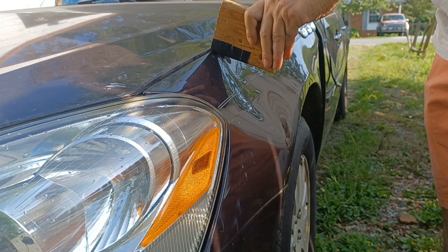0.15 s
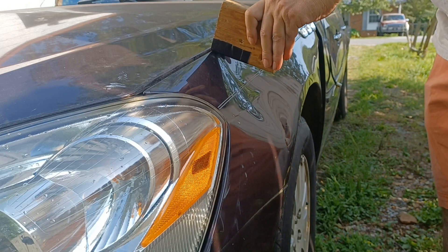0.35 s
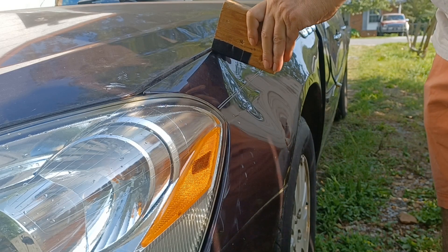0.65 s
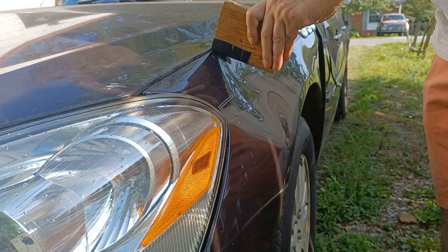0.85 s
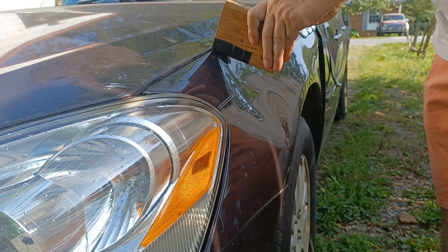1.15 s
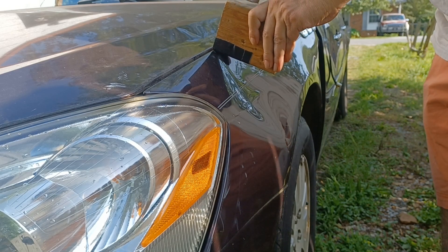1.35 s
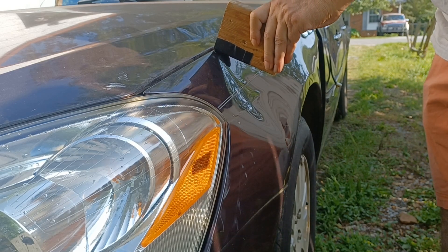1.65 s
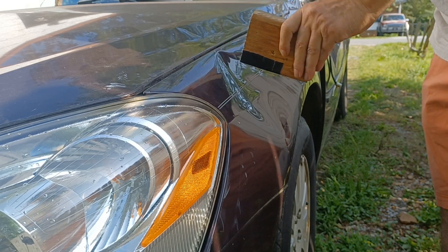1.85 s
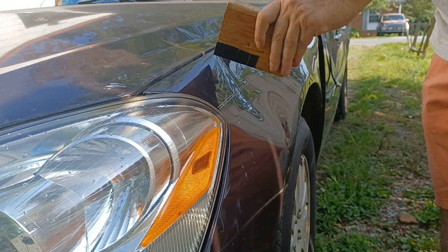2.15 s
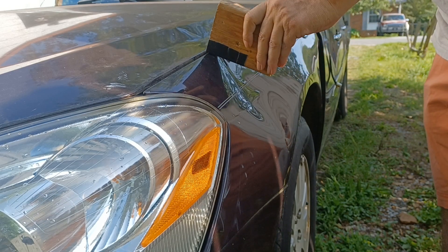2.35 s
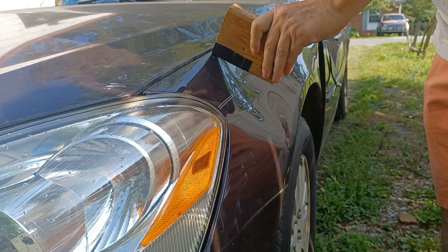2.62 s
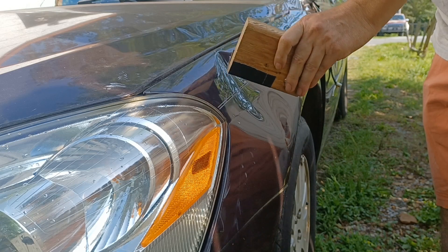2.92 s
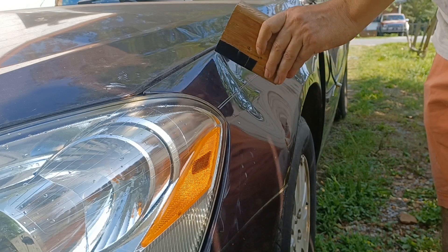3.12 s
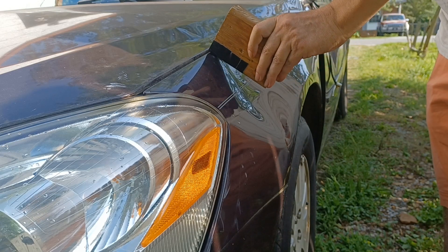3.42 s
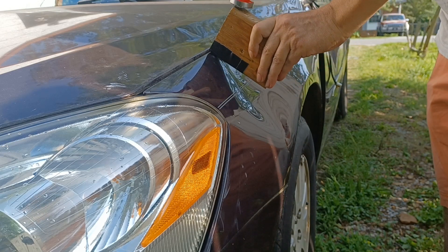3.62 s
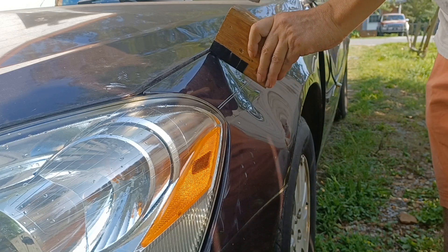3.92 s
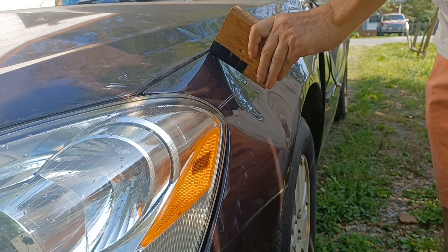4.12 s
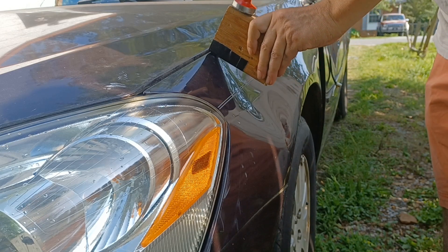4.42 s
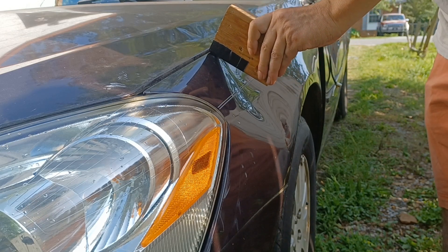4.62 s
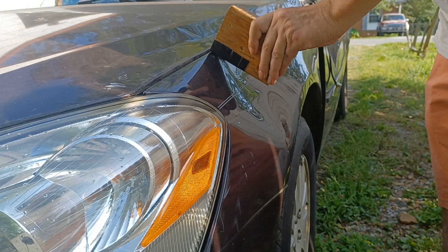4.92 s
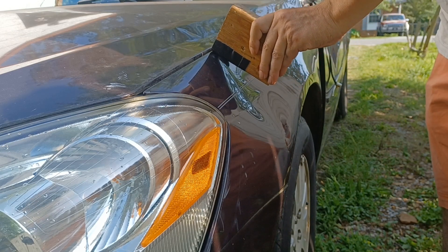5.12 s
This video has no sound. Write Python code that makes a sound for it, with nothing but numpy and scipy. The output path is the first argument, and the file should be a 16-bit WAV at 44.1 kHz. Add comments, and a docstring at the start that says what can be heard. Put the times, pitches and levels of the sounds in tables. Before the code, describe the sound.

Outdoors, over faint cicadas and a low hum of far machinery, a hammer drives a wood block against a steel car fender close to the microphone. A fast run of seven hard knocks makes the panel clang briefly each time. After a pause with a couple of soft taps, six more knocks build from dull to sharp, the last few sounding thinner on the left side.

```python
"""A hammer drives a hand-held wooden block against a car's steel fender: two runs, light taps between.
Each blow ticks on the wood, knocks the block, rings the panel's bending modes and buzzes its edges.
The yard echoes faintly; steady cicadas and far machinery rise and fall with the recorder's gain.
The right microphone is duller; late on, the left side loses bass and dips briefly at each knock."""
import sys
import numpy as np
from scipy import signal
from scipy.fft import rfft, irfft, next_fast_len
from scipy.io import wavfile
from scipy.ndimage import uniform_filter1d

SR = 44100
rng = np.random.default_rng(int(sys.argv[2]) if len(sys.argv) > 2 else 0)


def to_wav(s):
    """Save 16-bit WAV."""
    ch = np.atleast_2d(s).T  # columns
    pcm = np.round(np.clip(ch, -1, 1) * 32767)  # PCM
    wavfile.write(sys.argv[1], SR, pcm.astype(np.int16))


N = 232126
RING_SIZE = 2 ** 15
TIME_S, AGE_S = np.arange(N) / SR, np.arange(RING_SIZE) / SR

# hammer blows: (time [s], force [dB], contact corner [Hz], bass gain [dB])
BLOWS = [ (0.0504, 0, 3670, -2), (0.3618, -1, 3030, -0.5), (0.6372, 0, 3600, -1), (0.9247, 0, 3600, -2.5),
         (1.1932, 0, 3260, -2), (1.4720, 0, 3400, -3), (1.7301, 0, 3240, -2.5), (2.5228, -24.5, 880, -8),
         (3.4090, -16, 646, -4), (3.7153, -6, 600, 4), (4.0253, -1.5, 1310, 4.5), (4.3029, -1, 1460, 4),
         (4.5740, 0, 2200, 1.5), (4.8391, 0.5, 2180, 2.5), (5.1005, 0.5, 2500, 2)]
# panel response with the block moved to its second seat: (frequency [Hz], gain [dB])
SECOND_SEAT_EQ = [(250, -1.5), (360, 1.5), (520, -1), (660, -2.5), (1000, 3.5), (1400, 3.5), (2000, 0)]


def hammer(moved_s=3.0, moved_wood_db=1, fresh_share=0.4, bass_hz=170, mid_hz=420):
    """Each blow rings block and panel; a softer, longer contact takes the treble away."""
    track = np.zeros((2, N))
    modes, base_clang, wood = fender(), clang(), block()
    tick, edge_eq = face_tick(), edge_resonances()
    for time_s, force_db, corner_hz, bass_db in BLOWS:
        wood_db, buzz_db, tick_db = contact_levels(force_db, corner_hz)
        # the block shifts between blows and wakes slightly different weak modes
        ring = disperse(modes + np.sqrt(1 - fresh_share) * base_clang + np.sqrt(fresh_share) * clang())
        if time_s > moved_s:
            ring = colour(ring, SECOND_SEAT_EQ)
            wood_db += moved_wood_db
        contact = signal.butter(2, corner_hz, fs=SR, output="sos")
        knock = signal.sosfilt(contact, ring + undb(wood_db) * wood)
        # a firmly pressed block moves the whole panel, a loose one only its higher modes
        knock = colour(knock, [(bass_hz, bass_db), (mid_hz, 0)])
        buzz = edge_buzz(ring, edge_eq)
        add(track, undb(force_db) * knock + undb(buzz_db) * buzz + undb(tick_db) * tick, time_s)
    return track


def contact_levels(force_db, corner_hz, firm_hz=1360):
    """Contact softer than firm_hz weakens wood and buzz; the tick grows with hardness."""
    hardness_oct = np.log2(corner_hz / firm_hz)
    softness_oct = max(-hardness_oct, 0)
    wood_db = 1.5 - 14.5 * softness_oct
    buzz_db = force_db - 13 * softness_oct
    tick_db = force_db - 11 + 12.5 * hardness_oct
    return wood_db, buzz_db, tick_db


# steel-on-wood spectrum: (frequency [Hz], level [dB])
TICK_SPECTRUM = [(500, -28.5), (2000, -15.5), (3800, -17), (6300, -9), (8000, -34), (16000, -40)]


def face_tick(t60_s=0.0052):
    """The steel face meets the wood in a short noise burst."""
    return colour(noise(RING_SIZE, likeness=0.35) * fade(AGE_S, t60_s), TICK_SPECTRUM)


# wooden block modes: (frequency [Hz], level [dB], t60 [s])
BLOCK_MODES = [(1096, 4, 0.011), (1330, -4, 0.016), (1754, -1.5, 0.018)]


def block(rise_s=0.0038):
    """Hand-damped wood gives a brief hollow knock."""
    wood = sum((-1) ** k * undb(db) * fade(AGE_S, t60_s) * np.sin(2 * np.pi * hz * AGE_S)
               for k, (hz, db, t60_s) in enumerate(BLOCK_MODES))
    return rise(rise_s) * wood


# fender bending modes: (frequency [Hz], level [dB], t60 before block damping [s])
FENDER_MODES = [(113.8, -35, 0.71), (167.5, -13, 0.22), (142.9, -15.5, 0.33), (191.9, -17, 0.29),
                (231.5, -22.5, 0.37), (217.6, -18.5, 0.36), (246, -14.5, 0.34), (277.1, -20, 0.33),
                (323.3, -23.5, 0.29), (379.3, -8, 0.13), (364, -18.5, 0.28), (430, -26, 0.37),
                (475, -2, 0.023), (498.6, -10.5, 0.17), (553, -22, 0.34), (635, -16.5, 0.15),
                (713, -13.5, 0.085), (837.4, -20, 0.17), (917, -22, 0.082), (956.4, -23.5, 0.13),
                (999, -19, 0.11), (1119, -28.5, 0.22), (1144, -25, 0.029), (1346, -31, 0.18),
                (1490, -15.5, 0.0085), (1595, -24, 0.14), (1642, -19, 0.047), (1884, -17, 0.16),
                (2106, -38, 0.089), (2340, -27.5, 0.065)]


def fender(mean_lag_s=0.00006, lag_spread_s=0.00018, grip_t60_s=0.94, grip_hz=500):
    """The panel's main modes ring; the pressed block damps the higher ones most."""
    ring = np.zeros((2, RING_SIZE))
    # each mode radiates from its own patch, so has its own lag between the microphones
    lags_s = mean_lag_s + lag_spread_s * rng.standard_normal(len(FENDER_MODES))
    for k, ((hz, db, t60_s), lag_s) in enumerate(zip(FENDER_MODES, lags_s)):
        held_t60_s = 1 / (1 / t60_s + min(hz / grip_hz, 1) ** 3 / grip_t60_s)
        age_s = np.maximum(AGE_S - np.array([[lag_s], [-lag_s]]) / 2, 0)
        ring += (-1) ** k * undb(db) * fade(AGE_S, held_t60_s) * np.sin(2 * np.pi * hz * age_s)
    return ring


# spectrum of the weak panel modes: (frequency [Hz], level [dB])
CLANG_SPECTRUM = [(30, -26.5), (65, -20.5), (110, -6.5), (200, -11), (450, -2), (750, -3), (1100, -9.5),
                  (1500, -7), (2200, -5.5), (2700, -18.5), (4000, -31.5), (8000, -19.5)]


def clang(low_t60_s=0.17, high_t60_s=0.11, split_hz=1100, hold_s=0.016, rise_s=0.0019):
    """Dense modes blur into a noisy clang whose upper band dies first."""
    lowpass = signal.butter(4, split_hz, fs=SR, output="sos")
    highpass = signal.butter(4, split_hz, "high", fs=SR, output="sos")
    low = signal.sosfilt(lowpass, noise(RING_SIZE, likeness=0.45)) * fade(AGE_S - hold_s, low_t60_s)
    high = signal.sosfilt(highpass, noise(RING_SIZE, likeness=0.29)) * fade(AGE_S - hold_s, high_t60_s)
    return colour(rise(rise_s) * (low + high), CLANG_SPECTRUM)


def disperse(ring, travel_s=0.000892):
    """Bending waves cross the sheet in travel_s at 1 kHz; lower ones arrive later."""
    hz = np.arange(RING_SIZE // 2 + 1) * SR / RING_SIZE
    return irfft(rfft(ring) * np.exp(-4j * np.pi * travel_s * np.sqrt(1000 * hz)))


# panel edge buzz spectrum: (frequency [Hz], level [dB])
BUZZ_SPECTRUM = [(800, -52.5), (2000, -14), (3000, -16), (4500, -17), (6700, -20), (7900, -36.5),
                 (10000, -30.5), (12500, -29), (16000, -34)]


def edge_buzz(ring, edge_eq, hold_s=0.019, t60_s=0.11, rise_s=0.0016, chatter=0.24):
    """The panel's edges chatter briefly, hardest at the crests of its swing."""
    swing = np.abs(ring[0])
    crests = swing / (uniform_filter1d(swing, size=600) + 1e-9)
    envelope = rise(rise_s) * fade(AGE_S - hold_s, t60_s) * (1 + chatter * (crests - 1))
    hiss = colour(noise(RING_SIZE, likeness=0.2) * envelope, BUZZ_SPECTRUM)
    return colour(hiss, edge_eq)


def edge_resonances(ripple_db=2.0, mean_db=-1):
    """Narrow edge resonances as a random ripple: (frequency [Hz], gain [dB])."""
    hz = np.geomspace(2000, 16000, 220)
    return np.column_stack([hz, mean_db + ripple_db * rng.standard_normal(len(hz))])


def yard(knocks, gain_db=-17, t60_s=0.37, first_s=0.016):
    """Scattered echoes from car body, ground and nearby walls."""
    echoes = noise(RING_SIZE, likeness=0.17) * fade(AGE_S - first_s, t60_s) * (AGE_S > first_s)
    echoes /= np.sqrt(np.sum(echoes ** 2, axis=1, keepdims=True))
    echoes = colour(echoes, [(200, 0), (700, 0.0054), (2000, -3), (8000, 1)])
    return undb(gain_db) * signal.fftconvolve(knocks, echoes, axes=1)[:, :N]


# far machinery and traffic spectrum: (frequency [Hz], level [dB])
HUM_SPECTRUM = [(25, -65.5), (60, -42.5), (100, -29), (170, -31.5), (240, -35.5), (400, -41), (1000, -59),
                (2200, -59.5), (8000, -80.5)]
# machine tones: (frequency [Hz], level [dB])
HUM_TONES = [(120, -56), (234, -54.5)]
# recorder gain on the hum: (time [s], gain [dB])
RECORDER_GAIN_ON_HUM = [(1.9, 7.5), (2.1, -2), (2.9, 0), (3.5, 9.5), (4.15, 7)]


def far_hum(throb_db=1.0, tone_waver_db=3, pitch_spread=0.012):
    """Steady far machinery and traffic; recorder gain drops after the first run, then recovers."""
    hum = colour(noise(N, likeness=0.72), HUM_SPECTRUM) * undb(-throb_db * waver(rate_hz=4.6))
    for hz, db in HUM_TONES:
        pitch_hz = hz * (1 + pitch_spread * waver(rate_hz=14))
        phase = 2 * np.pi * np.cumsum(pitch_hz) / SR
        hum += undb(db + tone_waver_db * waver(rate_hz=9.8)) * np.sin(phase)
    return hum * undb(np.interp(TIME_S, *np.transpose(RECORDER_GAIN_ON_HUM)))


# cicada chorus spectrum: (frequency [Hz], level [dB])
CICADA_SPECTRUM = [(1500, -77.5), (2350, -60.5), (2750, -50.5), (4500, -51), (6200, -45.5), (7300, -51),
                   (8200, -71.5), (13000, -78.5), (16000, -91.5)]
# recorder gain on the cicadas: (time [s], gain [dB])
RECORDER_GAIN_ON_CICADAS = [(0, 0), (2.85, -0.5), (3.5, 9.5), (4.03, 9.5), (4.15, 0.5)]


def cicadas(shimmer_db=0.5):
    """Steady cicada hiss, rising and falling with the recorder's gain."""
    hiss = colour(noise(N, likeness=0.24), CICADA_SPECTRUM) * undb(-shimmer_db * waver(rate_hz=15))
    return hiss * undb(np.interp(TIME_S, *np.transpose(RECORDER_GAIN_ON_CICADAS)))


def undb(db):
    """Decibels to gain."""
    return 10 ** (np.asarray(db) / 20)


def rise(tau_s):
    """Exponential attack from 0 to 1."""
    return 1 - np.exp(-AGE_S / tau_s)


def fade(age_s, t60_s):
    """Unity until age 0, then exponential decay."""
    return np.exp(-np.log(1000) * np.maximum(age_s, 0) / t60_s)


def colour(x, points):
    """Minimum-phase filter through (frequency [Hz], gain [dB]) points."""
    size = 2 * next_fast_len(x.shape[-1] // 2 + 2048)
    hz, db = np.transpose(points)
    bins_hz = np.maximum(np.arange(size // 2 + 1) * SR / size, 1)
    gain = undb(np.interp(np.log(bins_hz), np.log(hz), db))
    cepstrum = irfft(np.log(gain))
    cepstrum[1:size // 2] *= 2
    cepstrum[size // 2 + 1:] = 0
    return irfft(rfft(x, size) * np.exp(rfft(cepstrum)))[..., :x.shape[-1]]


def noise(size, likeness):
    """Stereo white noise; likeness is the power share common to both sides."""
    common, *own = rng.standard_normal((3, size))
    return np.sqrt(likeness) * common + np.sqrt(1 - likeness) * np.array(own)


def waver(rate_hz):
    """Random wander with a spread near 1."""
    knots = rng.standard_normal(256)
    return np.interp(TIME_S * rate_hz, np.arange(len(knots)), knots)


def add(track, sound, start_s):
    """Mix a sound into the track at start_s."""
    start = int(start_s * SR)
    part = sound[:, :N - start]
    track[:, start:start + part.shape[1]] += part


def scene():
    """Knocks and their echoes over hum and cicadas."""
    knocks = hammer()
    return knocks + yard(knocks) + far_hum() + cicadas()


# thinned left channel: (frequency [Hz], gain [dB])
THIN_LEFT_EQ = [(100, -16), (250, -8), (500, 0), (1000, 0.5), (3000, -1)]


def thin_out(left, from_s=4.14, crossfade_s=0.0036, dip_db=-21, recover_s=0.033, lead_s=0.00049):
    """After from_s the left side loses bass and its level dips briefly at each knock."""
    blend = np.clip((TIME_S - from_s) / crossfade_s, 0, 1)
    dips_db = sum(np.interp(TIME_S - time_s, [-2 * lead_s, -lead_s, recover_s], [0, dip_db, 0])
                  for time_s, *_ in BLOWS if time_s > from_s)
    return (1 - blend) * left + blend * colour(left, THIN_LEFT_EQ) * undb(dips_db)


# right microphone response: (frequency [Hz], gain [dB])
RIGHT_MIC_EQ = [(600, 0), (1100, 0), (2000, -4), (3000, -5), (4500, -9.5), (6500, -29), (8000, -23.5),
                (12000, -9.5), (16000, -15.5)]


def record(dry):
    """Two unlike microphones, clipping at full scale and a steep 16 kHz low-pass."""
    pair = np.array([thin_out(dry[0]), colour(dry[1], RIGHT_MIC_EQ)])
    lowpass = signal.ellip(10, 0.2, 80, 16000, fs=SR, output="sos")
    return signal.sosfilt(lowpass, np.clip(pair, -1, 1))


dry = scene()
out = record(dry)
to_wav(out)
```